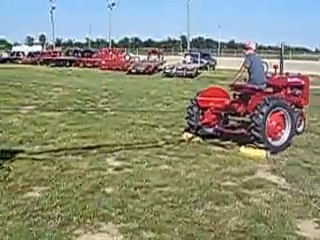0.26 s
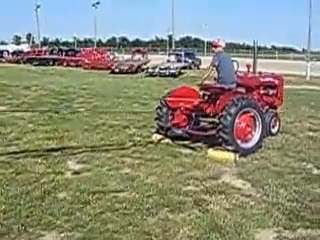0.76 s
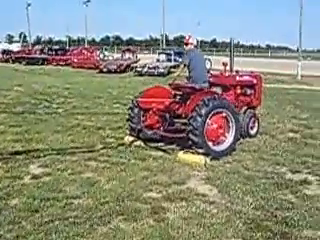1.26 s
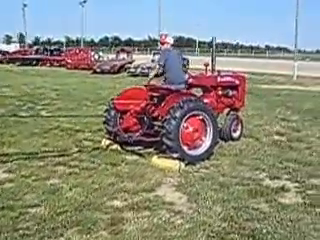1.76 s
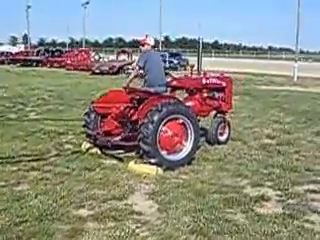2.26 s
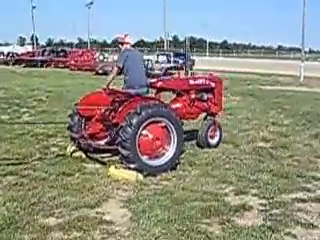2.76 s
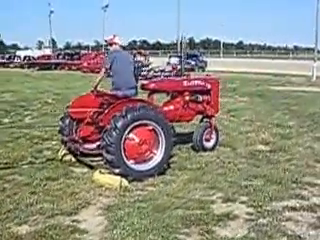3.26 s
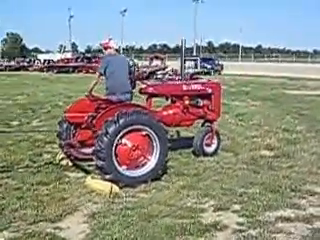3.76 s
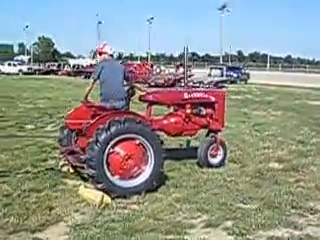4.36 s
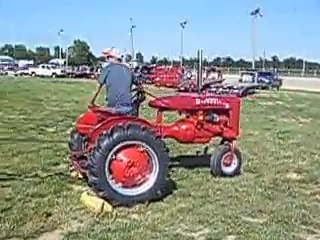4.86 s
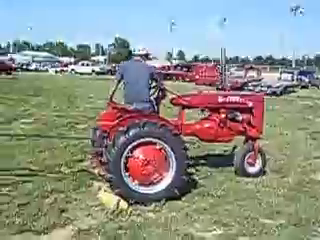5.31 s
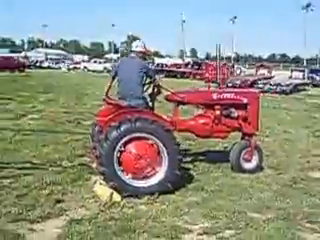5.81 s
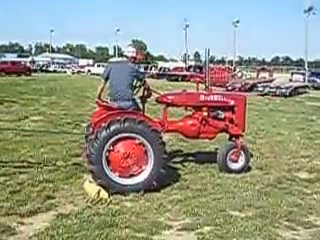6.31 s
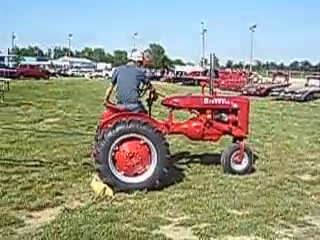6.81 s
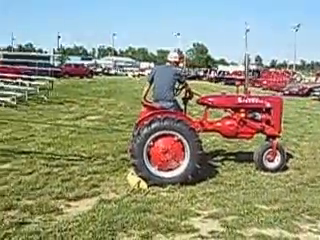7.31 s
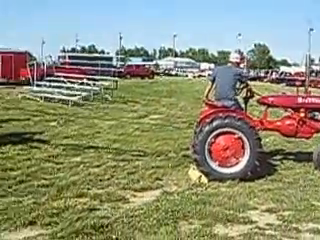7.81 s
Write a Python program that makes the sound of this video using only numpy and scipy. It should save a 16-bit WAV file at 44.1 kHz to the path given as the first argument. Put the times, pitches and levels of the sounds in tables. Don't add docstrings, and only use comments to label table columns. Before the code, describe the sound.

Outdoors on open grass, an old four-cylinder tractor pulls hard against a belt-driven brake. Its deep beating drone and raspy stack exhaust are loud from the start and sink slightly in pitch before levelling. Fan, gears and belt whirr underneath. Near three seconds a short gust makes the microphone tick. The small camera moves from behind to the side, its sound overloaded, dull on top and uneven in level.

```python
import sys
import numpy as np
from scipy import signal
from scipy.fft import rfft, irfft, next_fast_len
from scipy.io import wavfile
from scipy.ndimage import uniform_filter1d, map_coordinates

SR = 44100
rng = np.random.default_rng(int(sys.argv[2]) if len(sys.argv) > 2 else 0)


def wrap_up_sound(samples):
    columns = np.atleast_2d(samples).T
    tamed = np.clip(columns, -1, 1)
    steps = np.round(tamed * 32767).astype(np.int16)
    wavfile.write(sys.argv[1], SR, steps)


def amplitude_ratio(level_db):
    exponent = np.asarray(level_db, float) / 20
    return 10 ** exponent


N = 355887
T = np.arange(N) / SR

# t/s, speed/rpm
ENGINE_SPEED = [(0.0, 1514.3), (0.5, 1511.8), (1.0, 1491.7), (1.5, 1473.1), (2.0, 1457.8), (2.5, 1437.7),
                (3.0, 1425.9), (3.5, 1410.5), (4.0, 1398.7), (4.5, 1396.4), (5.0, 1389.8), (5.5, 1388.6),
                (6.0, 1378.9), (6.5, 1378.2), (7.0, 1377.1), (7.5, 1377.7), (8.07, 1384.2)]
# t/s, angle (0 behind, 1 beside), nearness to the stack mouth/dB, stack ring/dB
CAMERA_WALK = [(0, 0.23, -2, -0.3), (1, 0.16, -3.5, 1.8), (2, 0.2, -0.5, -0.9), (2.7, 0.16, -2.5, 1),
               (3.4, 0.46, 0.5, -2), (4.1, 0.52, 0, -2), (4.9, 0.73, 0.7, -1), (5.6, 0.82, 2, -0.7),
               (6.1, 0.86, -1, 2.5), (6.7, 0.8, 2.15, -1.35), (7.3, 0.81, 2.5, -0.44), (7.8, .9, 0, 2.5),
               (8.07, 0.74, -1.5, 0)]
# lag/share of a cycle, stack tone/dB, blast/dB
CYLINDERS = [(0.00146, -1, -6), (-0.009, -2, -6.54), (.008, -0.5, -5.5), (0.00114, -0.5, -7.5)]
# multiple of the cycle rate, level/dB
DRONE_ORDERS = [(2, -63.5), (3, -70), (4, -47), (5, -57), (6, -48.5), (7, -58.5), (8, -24), (9, -42.5),
                (10, -36.5), (12, -31.5), (13, -44.5), (14, -52), (16, -30), (17, -46.5), (18, -44.5),
                (20, -50), (24, -28), (25, -39.5), (26, -26.5), (27, -43.5), (28, -25.5), (29, -48.5),
                (30, -24.5), (31, -31.5), (32, -36), (33, -50), (34, -38), (35, -59), (36, -46.5)]
# t/s, stack tone/dB, blast/dB
BARKS = [(0.191, 7, 3), (0.23, 1.5, 3.5), (0.607, 10, 1), (6.794, 9.5, -0.5), (2.294, 8, 3.5),
         (6.184, -3, -3.3), (2.565, 10, 2), (3.026, -2.5, 1.5), (3.195, 4.5, 5.5), (3.492, -4.5, -1),
         (3.577, -0.5, -2), (4.369, 7.5, 5), (4.648, 6.5, 2.5), (4.906, 5, 0), (5.123, 5.5, 1),
         (0.551, 2, -0.5), (5.728, 6, 1.5), (5.858, 5, -3), (6.054, 6, 2), (6.337, 14, 4.5),
         (6.424, -0.5, 2), (6.511, 5.5, 1), (6.685, 7.5, -1.5), (7.12, 9, 0), (7.382, 7, 1.5),
         (7.425, 8.5, 3.5), (7.6, 6, 3.5), (7.643, 9, 2), (7.469, 1, 1), (7.752, -2.5, 5.5)]
# f/Hz, width/Hz, level/dB
STACK_BEHIND = [(377.3, 34, 1), (488, 40, -5.5), (642, 136, -6), (701.6, 45.5, 0), (801, 47.4, 1.5),
                (935, 56, 3), (1290, 98, -10.5)]
# f/Hz, width/Hz, level/dB
STACK_BESIDE = [(357, 72, -9), (457, 56, -15.5), (559.4, 85, -7), (698.3, 36.4, 8), (760, 170, -7.5),
                (908, 36, -9.5), (959, 52, -3.5), (1049, 70, -6), (1237, 180, -18)]
# f/Hz, width/Hz, level/dB
MOUTH_BEHIND = [(1135, 380, 10.5), (1898, 130, 17), (2343, 407, 15), (2852, 110, 16), (3138, 426, 12),
                (3280, 120, -10.5), (4340, 490, 0.5)]
# f/Hz, width/Hz, level/dB
MOUTH_BESIDE = [(1080, 350, 3.5), (1740, 84, 7.5), (1962, 170, 6), (2300, 98, 13), (2771, 258, 7.5),
                (3207, 160, 8.5), (3437, 214, 5), (4614, 400, -0.5)]
# f/Hz, level per Hz/dB
WHIRR = [(20, -45), (60, -14.5), (250, -23), (500, 3.5), (1000, 5), (2000, 2.5), (4000, -13), (8000, -29)]
# t/s, peak level/dB, length/s
GUSTS = [
    (2.872, -32, 0.044),
    (2.946, -25, 0.051),
]
# t/s, peak level/dB
FLAP_TICKS = [(2.8345, -13.5), (2.8414, -13), (2.8445, -15.5), (2.8609, -17), (2.8964, -13), (2.9015, -15),
              (2.9108, -13.5), (2.9164, -14), (2.9254, -14.5), (2.941, -13), (2.9467, -14.5)]
# t/s, gain/dB
GAIN_STEPS = [
    (0, 3),
    (0.253, -2.5),
    (0.68, -5),
    (1.521, -5.4),
    (3.143, -0.5),
    (3.619, -4),
    (4.407, -4.5),
    (4.947, -7),
    (6.215, -4.5),
    (6.807, -6.5),
]
# t/s, depth/dB, length/s
GAIN_DIPS = [
    (0.3, 2.5, 0.023),
    (1.084, 9, 0.0069),
    (1.854, 6.5, 0.027),
    (2.584, 4.5, 0.018),
    (5.46, 4.5, 0.0078),
    (6.345, 5.5, 0.037),
    (7.107, 7.5, 0.021),
]
# f/Hz, level/dB
MICROPHONE = [(20, -5.5), (3200, 1.5), (3700, -9.5), (4050, -12.5), (4400, -17), (4800, -18.5),
              (5100, -20.5), (22050, -60.5)]
# f/Hz, level/dB
BAND_EDGE = [(20, 1), (4850, -1), (5100, -11.5), (5350, -63), (22050, -96)]

FIRST_FIRING, SUCTION = 0.132, 0.39
LOBE_ANGLE, LOBE_WIDTH, LOBE_DB = 0.45, 0.26, 3.5
BARK_IN_GAS = 0.18
CRACK = 0.3
FLAP_DB, FLAP_S = 32, 0.003
CREEP_DB_PER_S, STEP_S = 7, 0.012
CONVERTER_TOP, EDGE_TOP = 0.98, 0.965


def curves(rows):
    s, *columns = np.transpose(rows)
    return [np.interp(T, s, column) for column in columns]


def unit(x):
    return x / np.sqrt(np.mean(x ** 2) + 1e-20)


def filtered(x, response):
    m = 2 * next_fast_len(N // 2 + SR // 4)
    return irfft(rfft(x, m) * response(np.fft.rfftfreq(m, 1 / SR)), m)[..., :N]


def colour(points):
    def response(hz):
        f, db = np.transpose(points)
        level_db = np.interp(np.log(hz + 1), np.log(f + 1), db)
        cepstrum = irfft(np.log(amplitude_ratio(level_db)))
        cepstrum[1:len(hz) - 1] *= 2
        cepstrum[len(hz):] = 0
        return np.exp(rfft(cepstrum))
    return response


def modes(rows):
    def response(f):
        total = 0
        for k, (centre, width, db) in enumerate(rows):
            ring = 1j * f * width / (centre * centre - f * f + 1j * f * width)
            total = total + (-1) ** k * amplitude_ratio(db) * ring
        return total
    return response


def wobble(rate, t=T):
    knots = rng.standard_normal(int(N * rate / SR) + 4)
    return map_coordinates(knots, [t * rate])


def swell(rows):
    return sum(amplitude_ratio(db) * np.exp(-((T - s) / length) ** 2) for s, db, length in rows)


def crank():
    return np.cumsum(curves(ENGINE_SPEED)[0]) / 120 / SR


def drone():
    step = 21
    cycle, t = crank()[::step], T[::step]
    angle = curves(CAMERA_WALK)[0][::step]
    lobe_db = LOBE_DB * np.exp(-((angle - LOBE_ANGLE) / LOBE_WIDTH) ** 2) - 1.5
    out = 0
    for order, db in DRONE_ORDERS:
        lag = np.pi / 2 * (1 - order % 2) + np.arctan((order - 31.3) / 0.8)
        lag = lag + 0.045 * (order - 11) ** 2 * (order < 20) - 1.1 * (order == 28)
        level_waver = order / 30 * wobble(7.6, t)
        phase_waver = order / 30 * wobble(6.4, t)
        level = np.sqrt(2) * amplitude_ratio(db + lobe_db * (order > 28.5) + 1.5 * level_waver)
        out = out - level * np.cos(2 * np.pi * order * (cycle - SUCTION) - lag + 0.3 * phase_waver)
    return signal.resample_poly(out, step, 1)[:N]


def firings():
    cycle = crank()
    count = np.arange(-4, 4 * int(cycle[-1]) + 4)
    cylinder = np.array(CYLINDERS)[count % 4]
    due = count / 4 + FIRST_FIRING + cylinder[:, 0]
    inside = (due > 0) & (due < cycle[-1])
    return cylinder[inside], np.interp(due[inside], cycle, T)


def train(times, db):
    place = np.clip(np.round(times * SR).astype(int), 0, N - 1)
    return np.bincount(place, amplitude_ratio(db), N)


def gas(times, db, rise, fall, floor):
    t = T[:SR // 10]
    puff = (1 - np.exp(-t / rise)) * np.exp(-t / fall)
    flare = signal.fftconvolve(train(times, db), puff)[:N]
    return (unit(flare) + floor) * rng.standard_normal(N)


def heard(x, behind, beside, angle):
    angle = np.clip(angle, 0, 1)
    from_behind = unit(filtered(x, modes(behind)))
    from_beside = unit(filtered(x, modes(beside)))
    return np.sqrt(1 - angle) * from_behind + np.sqrt(angle) * from_beside


def exhaust():
    angle, near_db, ring_db = curves(CAMERA_WALK)
    cylinder, s = firings()
    chance = rng.standard_normal((len(s), 3))
    extra_db = np.minimum(chance[:, 1:] * [1.8, 2.4], 1.8)
    bark = np.array(BARKS)
    nearest = np.abs(s[:, None] - bark[:, 0]).argmin(axis=0)
    extra_db[nearest] = bark[:, 1:]
    tone_extra, blast_extra = extra_db.T

    kick = unit(train(s + 0.00059 + 0.00034 * chance[:, 0], cylinder[:, 1] + tone_extra))
    rough_db = cylinder[:, 1] + BARK_IN_GAS * tone_extra
    rough = unit(gas(s, rough_db, rise=0.00072, fall=0.012, floor=1.0))
    tone = heard(0.6 * kick + 0.88 * rough, STACK_BEHIND, STACK_BESIDE, angle)

    rasp = unit(gas(s, cylinder[:, 2] + blast_extra, rise=0.00082, fall=0.0058, floor=0.15))
    crack = unit(train(s + 0.0012 + 0.0005 * chance[:, 0], blast_extra))
    blast = heard(rasp + CRACK * crack, MOUTH_BEHIND, MOUTH_BESIDE, angle)
    return amplitude_ratio(near_db) * (amplitude_ratio(-12.5 + ring_db) * tone + amplitude_ratio(-18.5) * blast)


def machinery():
    whirr = unit(filtered(rng.standard_normal(N), colour(WHIRR)))
    return amplitude_ratio(-25 + 1.5 * wobble(8)) * whirr


def wind():
    push = unit(filtered(rng.standard_normal(N), modes([(45, 49, 0)])))
    s, db = np.transpose(FLAP_TICKS)
    hiss = swell([(at, level, FLAP_S) for at, level in FLAP_TICKS]) * rng.standard_normal(N)
    port = modes([(4200, 1200, 0)])
    ticks = filtered(train(s, db + FLAP_DB) + hiss, lambda hz: port(hz) ** 2)
    return swell(GUSTS) * push + ticks


def gain_control():
    s, after_db = np.transpose(GAIN_STEPS)
    last = np.searchsorted(s[1:], T)
    ramp_db = after_db[last] + CREEP_DB_PER_S * (T - s[last])
    ramp_db = uniform_filter1d(ramp_db, size=max(1, int(STEP_S * SR)))
    dip_db = sum(depth * np.exp(-((T - at) / length) ** 2) for at, depth, length in GAIN_DIPS)
    return amplitude_ratio(ramp_db - dip_db)


def scene():
    return (drone() + exhaust() + machinery() + wind())[None]


def top_cut(x):
    return signal.sosfilt(signal.butter(12, 15850, fs=SR, output="sos"), x)


def record(dry):
    gain = gain_control()
    x = filtered(dry, colour(MICROPHONE)) * gain
    x = np.clip(x, -CONVERTER_TOP, CONVERTER_TOP)
    x = np.clip(filtered(x, colour(BAND_EDGE)), -EDGE_TOP, EDGE_TOP)
    x = x + amplitude_ratio(-82) * gain * rng.standard_normal(x.shape)
    return top_cut(x)


dry = scene()
out = record(dry)
wrap_up_sound(out)
```